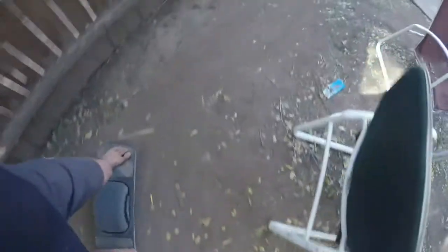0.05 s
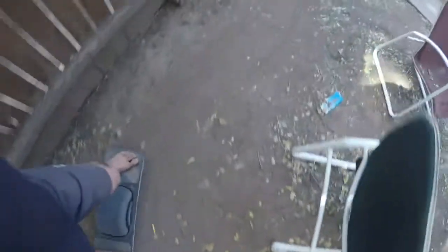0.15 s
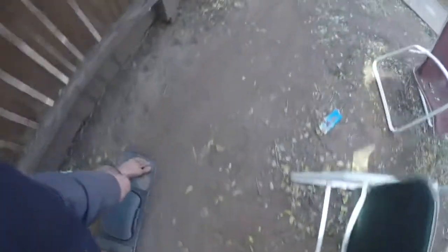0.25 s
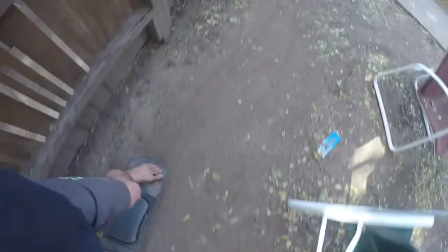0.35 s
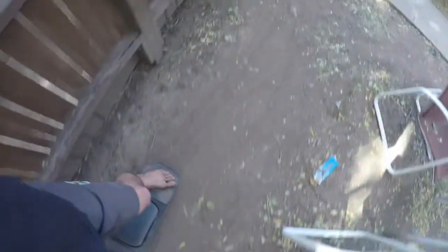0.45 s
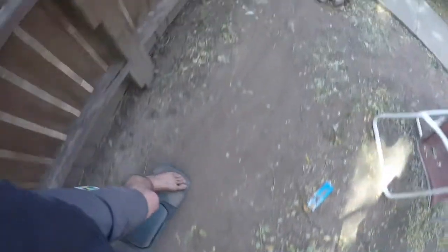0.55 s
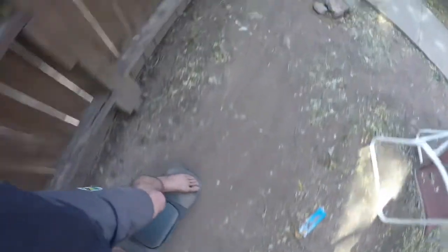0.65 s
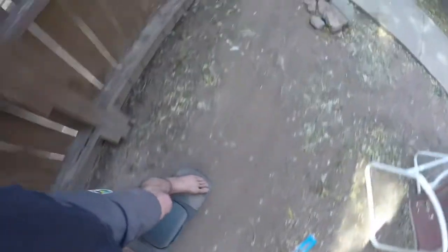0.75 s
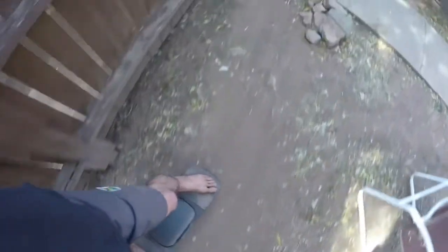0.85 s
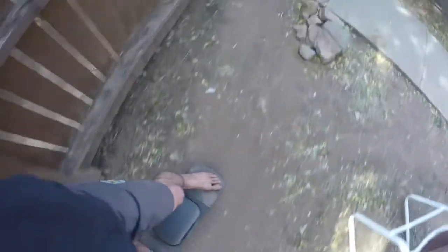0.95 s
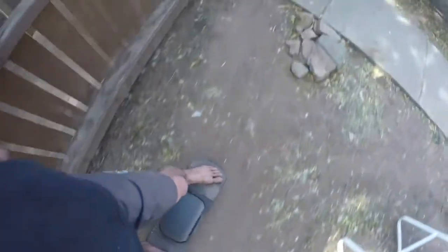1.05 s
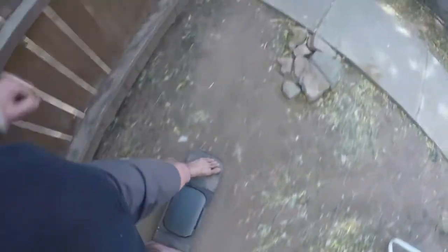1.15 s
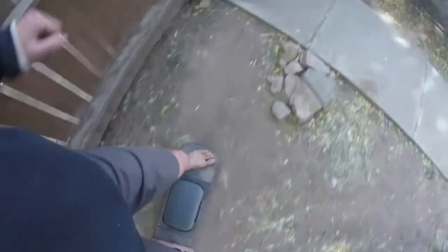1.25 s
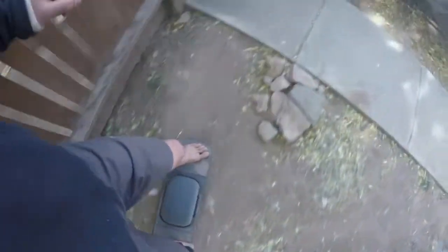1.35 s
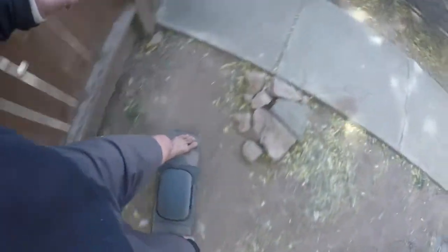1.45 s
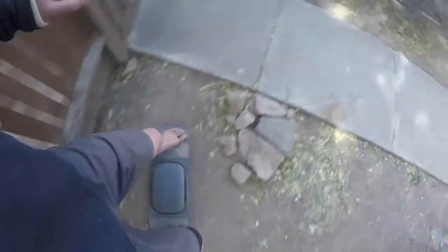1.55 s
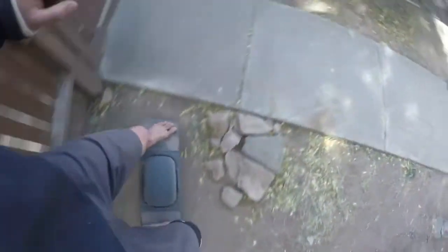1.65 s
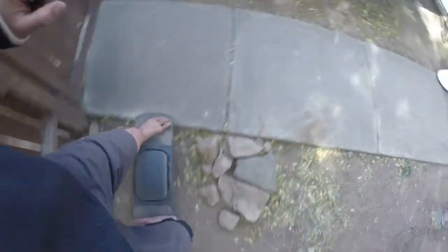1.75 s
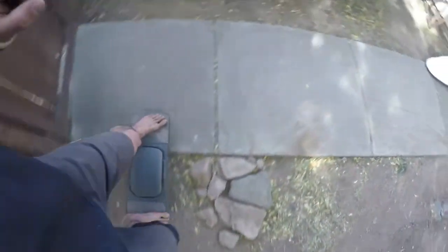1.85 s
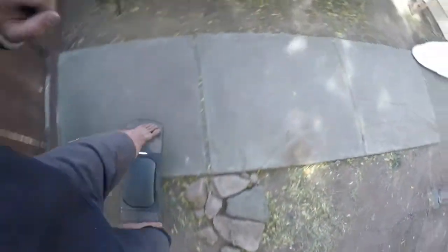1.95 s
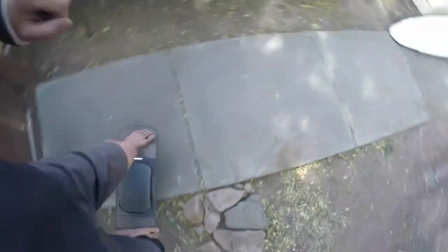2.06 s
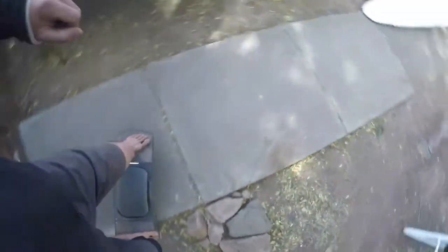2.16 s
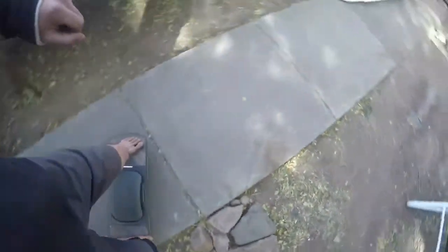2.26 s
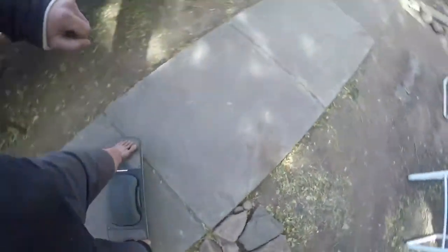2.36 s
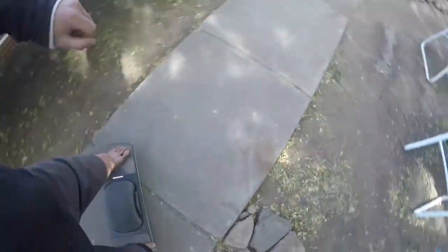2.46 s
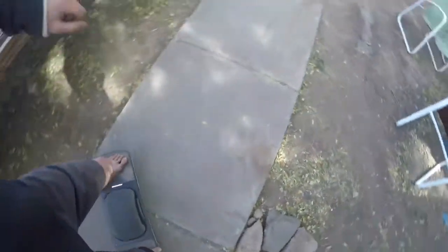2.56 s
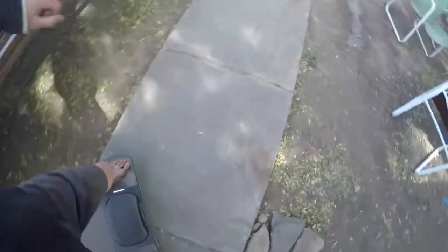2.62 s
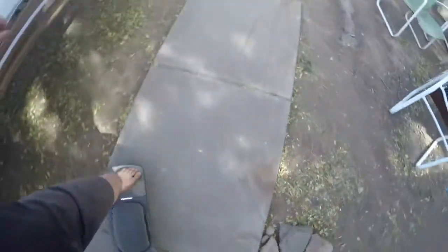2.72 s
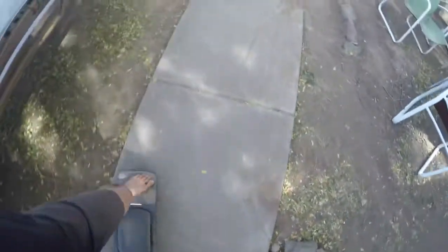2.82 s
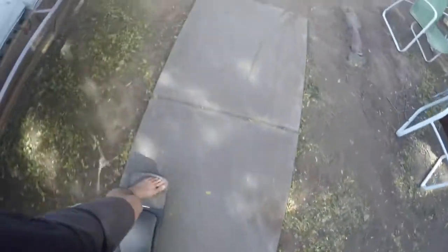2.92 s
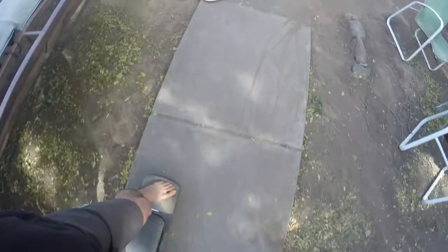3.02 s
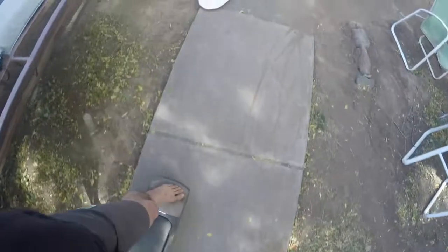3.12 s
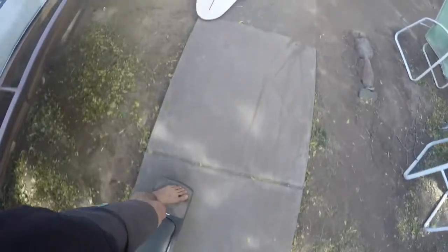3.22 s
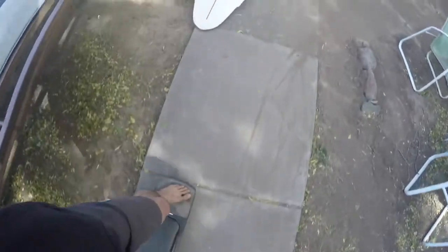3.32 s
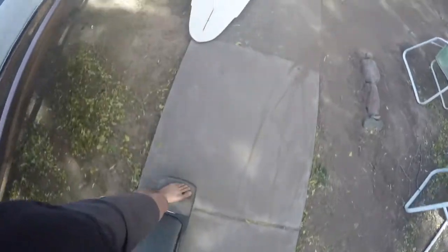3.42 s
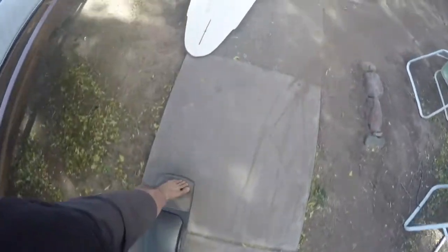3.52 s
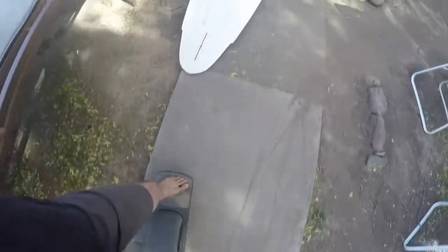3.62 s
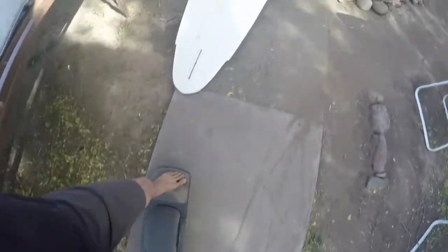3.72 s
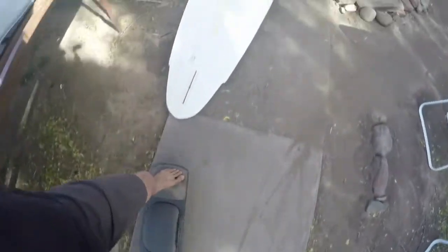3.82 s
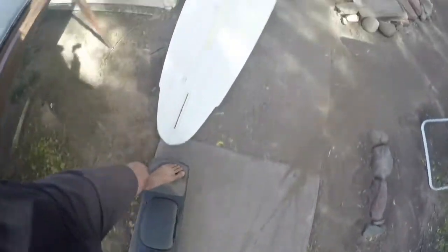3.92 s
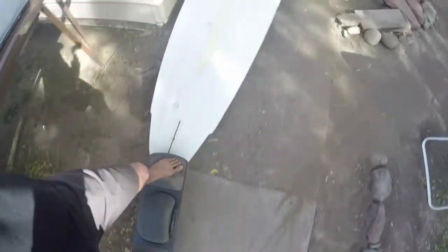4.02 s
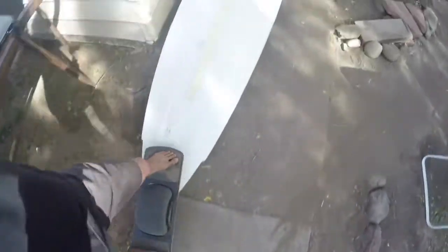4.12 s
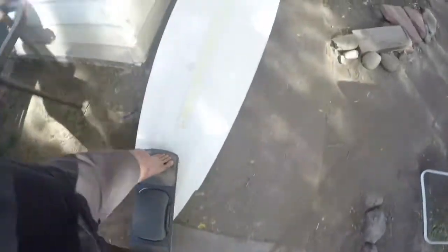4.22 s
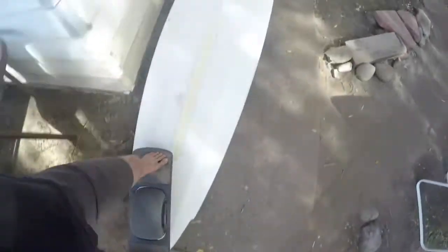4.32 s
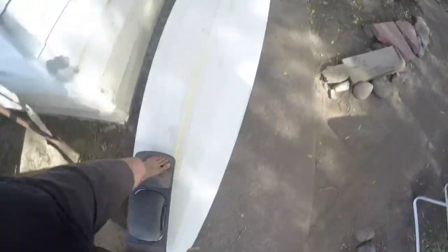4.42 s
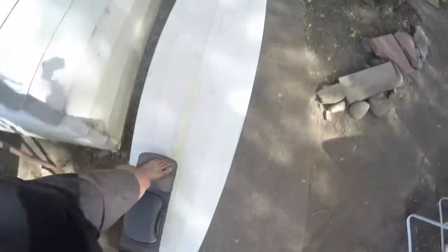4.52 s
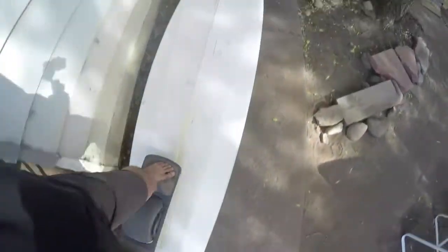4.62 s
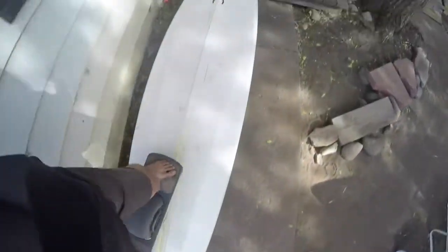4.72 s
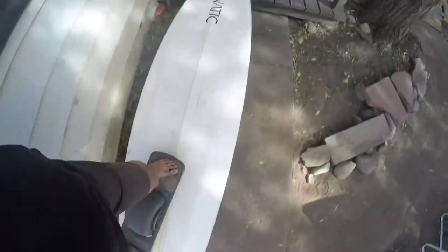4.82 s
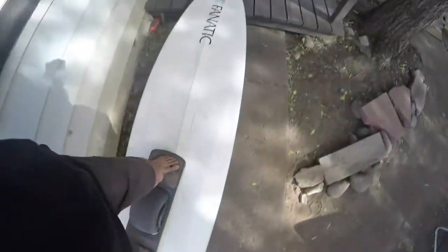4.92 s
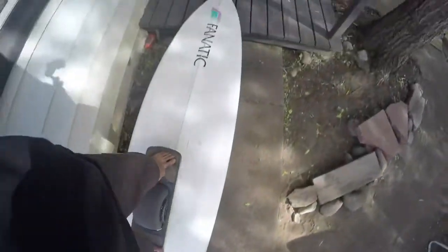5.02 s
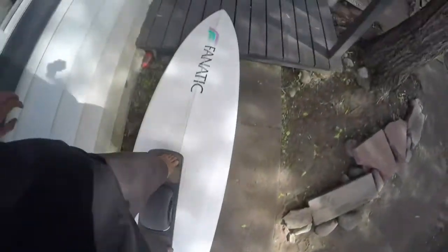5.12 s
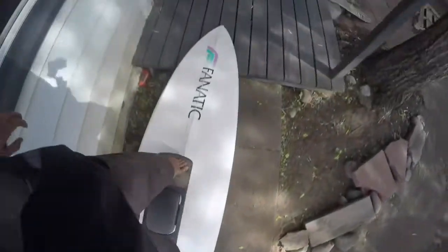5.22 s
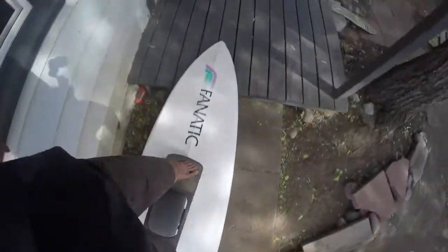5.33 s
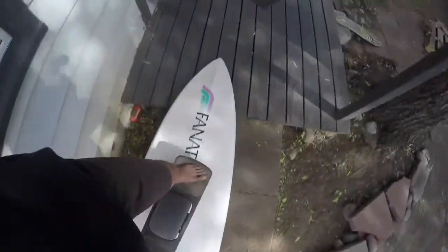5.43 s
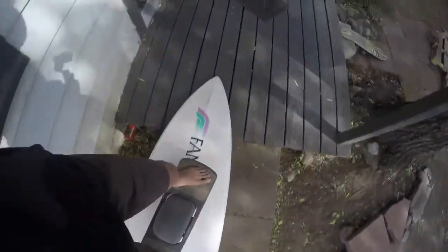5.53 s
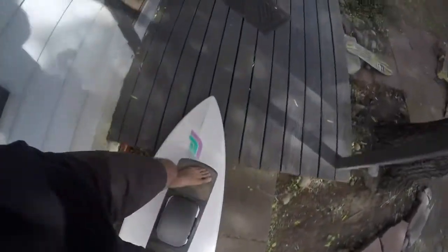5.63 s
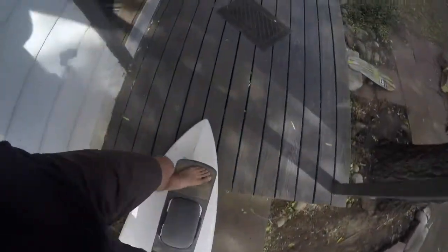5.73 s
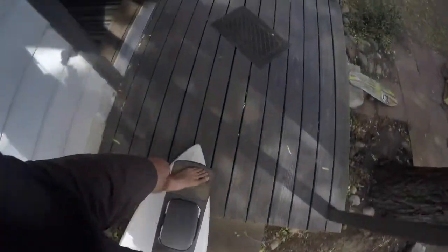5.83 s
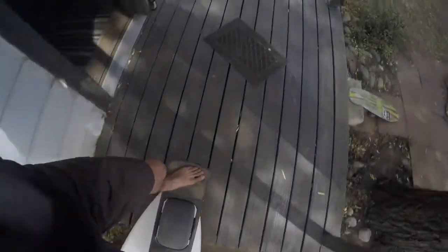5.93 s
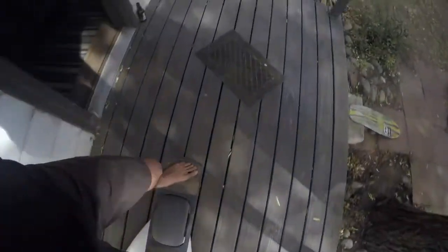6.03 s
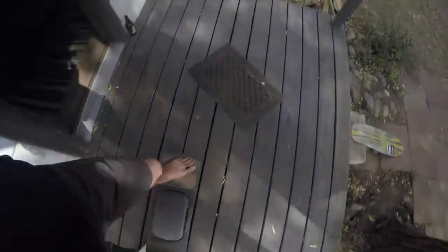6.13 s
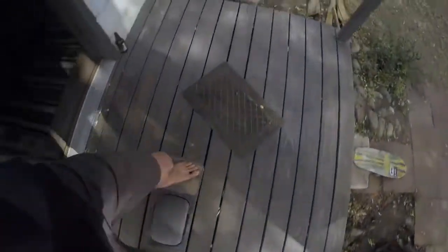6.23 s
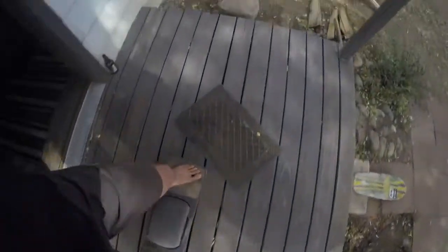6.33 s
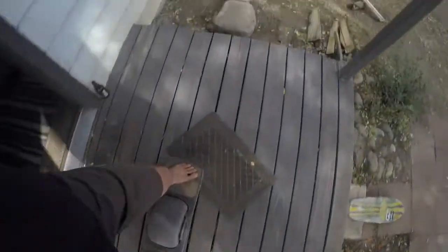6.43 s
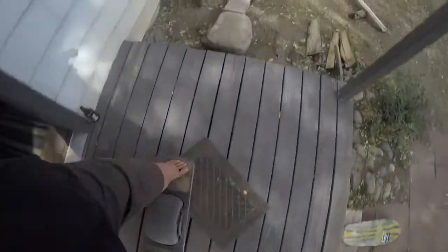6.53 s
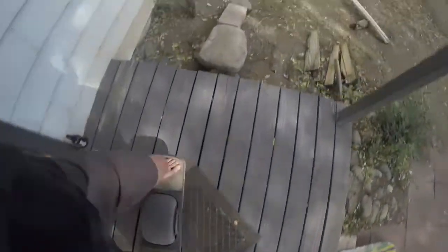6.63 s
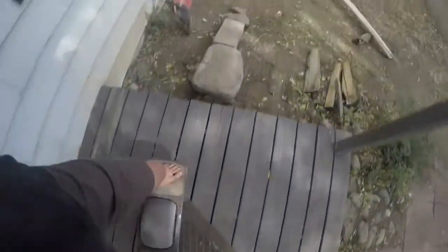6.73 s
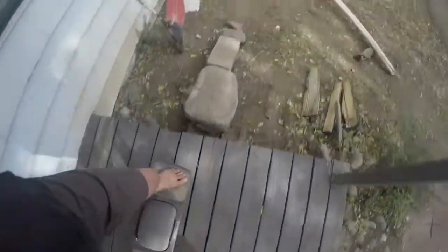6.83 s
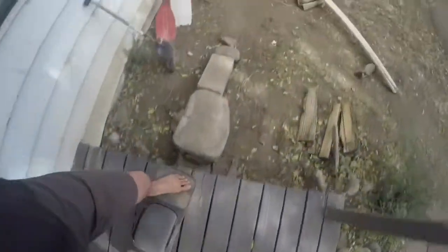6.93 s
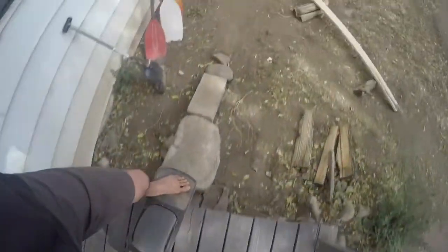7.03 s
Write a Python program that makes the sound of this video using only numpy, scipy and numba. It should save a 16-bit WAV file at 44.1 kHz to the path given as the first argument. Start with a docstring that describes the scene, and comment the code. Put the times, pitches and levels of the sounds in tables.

```python
"""An electric one-wheeled board rolls over dirt: motor hum, tyre noise and small ticks, with a
low drone nearby and wind on the microphone. Near 1.8 s it clacks onto paving and rumbles over the
slabs. At 4.1 s it climbs a hollow surfboard lying on the ground; knocks crack and ring the shell and
grit scrapes under bumper and tyre. Near 6.2 s it drops on a wooden deck, whose planks ring until the
wheel's weight stills them."""
import sys
import numpy as np
from scipy import signal
from scipy.io import wavfile
from scipy.ndimage import uniform_filter1d
from numba import njit

SR = 44100
rng = np.random.default_rng(int(sys.argv[2]) if len(sys.argv) > 2 else 0)


def transcribe(u):
    """Save the signal u as a 16-bit wav file named by the first command-line argument.

    u: samples, shape (n,) or (channels, n), limited to [-1, 1]; the rate is SR.
    q: integer samples, one column per channel.
    """
    v = np.clip(np.atleast_2d(u).T, -1, 1)
    q = np.round(v * 32767).astype(np.int16)
    wavfile.write(sys.argv[1], SR, q)


N = 311785
TIME_S = np.arange(N) / SR


def undb(db):
    return 10 ** (np.asarray(db) / 20)


def unit(x):
    return x / np.sqrt(np.mean(x ** 2))


def power_sum(gains):
    return np.sqrt(sum(g ** 2 for g in gains))


def add(out, start_s, x):
    i = int(start_s * SR)
    out[i:i + len(x)] += x[:N - i]


def curve(table, column=1):
    rows = np.array(table, float)
    return np.interp(TIME_S, rows[:, 0], rows[:, column])


def swell(start_s, db, rise_s, hold_s, fall_s):
    """Gain held from start_s; rise and fall times span 20 dB and are at least 1 ms."""
    t = TIME_S - start_s
    rise_db = 20 * np.minimum(t, 0) / max(rise_s, 1e-3)
    fall_db = 20 * np.maximum(t - hold_s, 0) / max(fall_s, 1e-3)
    return undb(db + rise_db - fall_db)


@njit
def svf(x, hz, damping):
    """State-variable filter: (band-pass, low-pass)."""
    band, low = np.empty(len(x)), np.empty(len(x))
    band_state, low_state = 0., 0.
    g = np.tan(np.pi * hz / SR)
    for i in range(len(x)):
        v = (band_state + g * (x[i] - low_state)) / (1 + g * (g + damping))
        band[i], low[i] = damping * v, low_state + g * v
        band_state, low_state = 2 * v - band_state, low_state + 2 * g * v
    return band, low


def lowpass(x, hz, damping):
    return svf(x, float(hz), damping)[1]


def bandpass(x, hz, width_hz):
    """Two stages, unit RMS out."""
    for _ in range(2):
        x = svf(x, float(hz), width_hz / hz)[0]
    return unit(x)


def ring(x, hz, t60_s):
    """One decaying mode driven by x."""
    pole = np.exp(2j * np.pi * hz / SR - np.log(1000) / (t60_s * SR))
    return signal.lfilter([1], [1, -pole], x).imag


def walk(rate_hz):
    """Smoothed random steps, unit RMS."""
    hold = int(SR / rate_hz)
    steps = np.repeat(rng.standard_normal(N // hold + 1), hold)
    return unit(uniform_filter1d(uniform_filter1d(steps, hold), hold)[:N])


def grit(per_s, spread_db):
    """Random clicks, a few much bigger than the rest."""
    clicks = (rng.random(N) < per_s / SR) * rng.standard_normal(N)
    return clicks * undb(spread_db * np.minimum(rng.exponential(size=N), 5))


# t/s, level/dB, f/Hz, half length/s
TREBLE_PUFFS = [(1.438, -65, 6600, 0.038), (1.878, -70, 7000, 0.014), (1.988, -74, 9900, 0.026),
                (2.329, -78, 8850, 0.051)]

def rustles(hiss_db=-76.5):
    """Smooth puffs of treble over the microphone's own hiss."""
    noise = rng.standard_normal(N)
    out = undb(hiss_db) * noise
    for s, db, hz, half_s in TREBLE_PUFFS:
        out += undb(db) * np.exp(-((TIME_S - s) / half_s) ** 2) * bandpass(noise, hz, 1.15 * hz)
    return out


# t/s, level/dB
DRONE_LEVEL = [(0, -37.5), (.6, -37), (1.6, -51), (2.2, -43), (3.4, -46), (4.5, -52), (5.6, -42),
               (7.07, -75)]

def drone(hz=58.7):
    """One low wavering tone nearby."""
    phase = 2 * np.pi * np.cumsum(hz * (1 + 0.009 * walk(6.2))) / SR
    return np.sqrt(2) * undb(curve(DRONE_LEVEL) + 0.6 * walk(37)) * np.sin(phase)


# Turbulence: t/s, level/dB
WIND_LEVEL = [(0, -39), (.18, -31.5), (.49, -30), (.55, -49.5), (1.75, -36.5), (1.89, -27), (2.03, -44.5),
              (2.77, -27), (2.91, -52), (3.05, -28.5), (3.25, -38), (3.68, -32), (4.05, -31.5),
              (4.8, -31.5), (5.22, -25.5), (5.42, -37), (6.06, -36.5), (6.16, -20.5), (6.24, -30.5),
              (6.79, -26), (7.07, -36.5)]
# t/s, level/dB, hold/s
WIND_GUSTS = [(0.144, -36.5, 0.012), (0.293, -27.5, 0.0038), (0.336, -41.5, 0.27), (2.4, -48, 0.29),
              (2.742, -39.5, 0.24), (3.08, -43.5, 0.028), (3.712, -30.5, 0.056), (3.79, -27, 0.0076),
              (4.005, -34, 0.17), (4.564, -33.5, 0.11), (4.782, -36, 0.21), (5.105, -25, 0.0051),
              (5.192, -25, 0.04), (5.25, -35.5, 0.069), (6.536, -29.5, 0.007), (6.709, -32, 0.098),
              (6.948, -45.5, 0.11)]
# t/s, level/dB, f/Hz (1 / cycle length)
WIND_BUFFETS = [(0.259, -26.5, 51.4), (2.758, -47, 86), (3.738, -24, 51), (3.786, -12, 88),
                (4.012, -19.5, 104), (4.06, -16, 56.5), (4.11, -11.5, 66.6), (4.144, -12, 97),
                (4.292, -12.5, 55.8), (4.659, -27, 50.6), (4.769, -38, 81), (4.855, -14.5, 53),
                (5.107, -38, 51.2), (5.181, -21, 85.5), (5.207, -12.5, 65.5), (6.12, -22, 129),
                (6.144, -20, 120), (6.53, -18.5, 74.6), (6.542, -19, 52), (6.694, -14, 126),
                (6.714, -10.5, 106), (6.766, -15, 60.7), (6.788, -11, 87.5)]

def wind(gust_rise_s=0.065, gust_fall_s=0.031, gust_rumble_db=0.5):
    """Air on the microphone: low turbulence, fluttering gusts and one-cycle buffets, all low-passed."""
    low_eddies, high_eddies = rng.standard_normal((2, N)) * undb(0.5 * walk(31))
    gusts = power_sum(swell(s, db, gust_rise_s, hold_s, gust_fall_s) for s, db, hold_s in WIND_GUSTS)
    turbulence = unit(lowpass(bandpass(low_eddies, 36, 98), 75, damping=1.0))
    flutter = bandpass(high_eddies, 122, 177) + 0.23 * bandpass(high_eddies, 230, 510)
    out = power_sum([undb(curve(WIND_LEVEL)), undb(gust_rumble_db) * gusts]) * turbulence
    out += gusts * unit(lowpass(flutter, 450, damping=2.2))
    for s, db, hz in WIND_BUFFETS:
        cycles = np.arange(int(2.2 * SR / hz)) * hz / SR
        pressure = -np.sin(2 * np.pi * cycles ** 0.51)  # jumps fast, relaxes slowly
        add(out, s, undb(db) * pressure * np.exp(-((cycles - 0.4) / 0.56) ** 2))
    return lowpass(out, 700, damping=1.98)


# t/s, pulse rate/Hz, level/dB, extra on order 3/dB
MOTOR_RUN = [(0, 26.6, -31.5, 2), (.35, 26.96, -31.5, -9), (1.2, 27.44, -30.5, -1.5), (1.9, 28.69, -37, 5),
             (3.2, 28.97, -36, 2.5), (4.0, 29.72, -35, -1), (4.6, 30.33, -43, -1.5), (7.07, 29.77, -50, -2)]
# Multiple of the pulse rate, gain/dB
MOTOR_ORDERS = [(1, -15.5), (2, -24.5), (3, -6.5), (4, -3), (5, -16.5), (6, -19.5), (7, -21), (8, -28.5)]
# f/Hz, level before load gain/dB
SWITCHING_TONES = [(14290, -98), (14530, -94)]
# t/s, hold/s, whine gain/dB
MOTOR_PULLS = [(.35, 1.2, 4), (3.45, 0.92, 5), (4.598, 0.54, 2), (6.55, 0.35, 3)]

def motor(coast_db=-10, fade_s=0.15):
    """Wavering harmonics of the pulse rate; a thin switching whine grows when the motor pulls."""
    phase = 2 * np.pi * np.cumsum(curve(MOTOR_RUN) * (1 + 0.0043 * walk(9.82))) / SR
    third_db = curve(MOTOR_RUN, column=3)
    hum = whine = 0
    for order, db in MOTOR_ORDERS:
        gain = undb(db + 2.5 * walk(26) + third_db * (order == 3))
        hum += gain * np.sin(order * phase + 0.52 * walk(22) + 2 * np.pi * rng.random())
    for hz, db in SWITCHING_TONES:
        whine += undb(db + 3 * walk(15)) * np.sin(2 * np.pi * hz * TIME_S + 6 * walk(30))
    load = undb(coast_db) + sum(swell(s, db, fade_s, hold_s, fade_s) for s, hold_s, db in MOTOR_PULLS)
    return np.sqrt(2) * (undb(curve(MOTOR_RUN, column=2)) * hum + load * whine)


# t/s, level/dB, rise/s, hold/s, fall/s
SLAB_SWELL = (2, -41, -0.1, 1.64, 0)

def slab_rumble():
    """A narrow, uneven low band while the tyre is on the slabs."""
    return swell(*SLAB_SWELL) * bandpass(rng.standard_normal(N), 100, 14)


# Rows: dirt, paving, surfboard tail, its belly and nose, deck
# t/s, rolling level/dB, crunch tilt/(dB/oct), hollow level/dB
SURFACES = [(0, -45.5, 0.18, -80), (1.85, -46.5, -0.28, -64.5), (4.15, -46, 0.2, -56),
            (4.9, -45.5, -0.2, -53), (6.151, -47, 0.06, -52.5)]
# Tyre and surroundings: f/Hz, relative density/dB
ROLL_SPECTRUM = [(88, -8.5), (150, -3), (196, -1.5), (278, -3.5), (343, -7.5), (450, -10.5), (545, -9.5),
                 (954, -24.5), (1200, -20), (1490, -25), (3670, -35), (6680, -45.5), (15000, -74)]

def tyre(crossing_s=0.23):
    """Gritty rolling noise in flickering third-octave bands, plus a broad resonance on hollow ground."""
    surfaces, spectrum = np.array(SURFACES, float), np.array(ROLL_SPECTRUM)
    under_tyre = surfaces[np.searchsorted(surfaces[1:, 0], TIME_S), 1:]
    level_db, tilt_db_oct, hollow_db = uniform_filter1d(under_tyre.T, int(crossing_s * SR))
    shared_db = 0.6 * walk(8.8)
    fine_grit = 0.31 * unit(grit(3000, spread_db=6))
    rolling = 0
    for hz in 94 * 2 ** (np.arange(22) / 3):
        band_db = np.interp(np.log(hz), np.log(spectrum[:, 0]), spectrum[:, 1]) + 10 * np.log10(hz)
        gain = undb(band_db + tilt_db_oct * np.log2(hz / 1000) + shared_db + 1.1 * walk(14))
        rolling += gain * bandpass(rng.standard_normal(N) + fine_grit, hz, hz / 3)
    hollow = undb(hollow_db + 1.8 * walk(15)) * bandpass(rng.standard_normal(N), 600, 780)
    return undb(level_db) * unit(rolling) + hollow


# t/s, level/dB, f/Hz, bandwidth/f, t60/s
TICKS_AND_CRACKS = [(0.295, -55, 1300, 1, 0.023), (.868, -55, 3000, 0.89, .015),
                    (.947, -47, 1500, 0.67, .03), (1.032, -51, 1500, 0.74, .025),
                    (1.492, -50, 1500, .9, 0.027), (1.607, -47.5, 1600, 0.83, .03),
                    (1.667, -48, 4500, 2.6, 0.0082), (1.73, -52, 1540, .8, .025),
                    (1.761, -48, 1320, .8, .025), (1.951, -51, 1900, .6, .02),
                    (1.977, -43, 1960, 0.39, 0.048), (2.041, -56, 3650, 0.56, 0.03),
                    (2.187, -57, 1100, .7, 0.023), (2.354, -51.5, 3900, 0.9, 0.025),
                    (2.411, -55.5, 3030, 0.45, 0.023), (2.593, -52, 1400, 1.2, 0.018),
                    (2.595, -57, 5020, 1.45, 0.007), (2.62, -45, 700, .7, .03), (2.78, -53, 700, .7, .03),
                    (2.909, -44, 750, 0.59, 0.045), (2.945, -46, 1200, 0.48, 0.095),
                    (2.946, -53, 2600, 0.35, 0.027), (2.983, -56, 2600, 0.26, .03),
                    (3.068, -51.5, 1180, 0.55, .025), (3.601, -49, 700, .7, .03),
                    (4.066, -43.5, 3730, 0.8, 0.025), (4.110, -40, 12000, 2.2, 0.011),
                    (4.126, -43, 12000, 1.5, .015), (4.155, -18, 1920, 0.65, 0.023),
                    (4.165, -23, 2000, 0.35, 0.027), (4.311, -18.5, 1100, 0.85, 0.02),
                    (4.317, -17.5, 750, 0.54, 0.045), (4.363, -32, 3020, 0.34, 0.029),
                    (4.365, -44, 4970, 0.47, 0.037), (4.364, -56, 9000, 1.5, .025),
                    (4.39, -48, 7900, 0.71, 0.021), (4.844, -46.5, 2500, 0.78, 0.03),
                    (4.886, -53, 2170, 1.4, 0.075), (5.522, -41.5, 1700, 1, 0.092),
                    (5.541, -53, 3000, 1.2, .04), (5.571, -41, 1510, 0.92, 0.11),
                    (5.716, -56, 4000, 0.96, 0.026), (5.803, -42, 1300, .9, 0.085),
                    (5.802, -43.5, 2900, 0.091, 0.059), (5.804, -45, 3800, 0.11, 0.046),
                    (6.017, -49, 3376, 1.6, 0.015), (6.128, -45.5, 3630, 0.37, 0.041),
                    (6.19, -55.5, 2515, 1, 0.027), (6.572, -52, 4340, 0.47, 0.012),
                    (6.845, -45, 2340, 0.28, 0.079), (6.974, -47.5, 1680, 0.5, 0.057)]

def ticks_and_cracks():
    """Small ticks under the tyre, and sharp cracks as the board strikes the surfboard."""
    out, t = np.zeros(N), np.arange(SR // 8) / SR
    for s, db, hz, width, t60_s in TICKS_AND_CRACKS:
        noise = rng.standard_normal(len(t))
        tone = bandpass(noise, hz, width * hz) * 1000. ** (-t / t60_s)
        snap = bandpass(noise, min(4.9 * hz, 12000), 13 * hz) * np.exp(-t / 0.00057)
        add(out, s, undb(db) * (tone + 0.033 * snap))
    return out


# t/s, level/dB, rise/s, hold/s, fall/s, rasp f/Hz, relative treble/dB
GRIT_SCRAPES = [(2.925, -66, .06, 0.064, 0.036, 1270, -45), (2.93, -50.5, .05, 0.045, 0.05, 595, -42),
                (4.09, -43.5, .004, 0.028, 0.028, 1670, -16), (4.159, -37, 0.082, 0, 0.096, 2180, -23),
                (4.313, -52, 0.0078, 0.012, 0.45, 1830, -28), (4.558, -53, 0.004, 0, 0.26, 2100, -22),
                (4.605, -63, 0.027, 0.049, 0.071, 3730, -6),
                (4.81, -52, 0.026, 0.00017, 0.062, 1600, -17.5),
                (4.884, -49.5, 0.021, 0.0068, 0.073, 1760, -26),
                (4.97, -59.5, 0.037, 0.031, 0.034, 1950, -28), (5.521, -60, .004, 0.1, 0.041, 1870, -21),
                (5.802, -49, 0.0032, 0.0086, 0.021, 1630, -27),
                (6.099, -50, 0.0025, 0.0066, 0.078, 1500, -30),
                (6.193, -37.5, 0.0024, 0.011, 0.035, 1480, -29),
                (6.275, -57.5, 0.049, 0.099, 0.047, 2000, -28)]

def scrapes():
    """Grit dragged under bumper and tyre, heard through the shell and as bright hiss."""
    grains = unit(grit(9000, spread_db=2)) * undb(1.6 * walk(90))
    bright = bandpass(grains, 8200, 12000)
    return sum(swell(*envelope) * (bandpass(grains, hz, 1.27 * hz) + undb(treble_db) * bright)
               for *envelope, hz, treble_db in GRIT_SCRAPES)


# t/s, level/dB, f/Hz, snap f/Hz, relative snap/dB, decay/s
PAVING_JOINTS = [(1.77, -33.5, 414, 1400, -22, 0.0055), (1.855, -27.5, 558, 2100, -15, 0.0058),
                 (3.511, -28.5, 627, 1320, -30, 0.0051)]

def clacks():
    """The tyre hits paving joints: a sharp snap, a dull ring of the frame, a short gritty tail."""
    out, t = np.zeros(N), np.arange(SR // 8) / SR
    onset, thud_onset = 1 - np.exp(-(t / 0.0006) ** 2), 1 - np.exp(-(t / 0.001) ** 2)
    for s, db, hz, snap_hz, snap_db, decay_s in PAVING_JOINTS:
        noise = rng.standard_normal(len(t))
        thud = 1.3 * np.sin(2 * np.pi * hz * t) + 0.5 * bandpass(noise, hz, 0.6 * hz)
        thud *= thud_onset * np.exp(-t / decay_s)
        frame = 0.45 * bandpass(noise, 1.6 * hz, 700) * np.exp(-t / 0.005)
        snap = 1.5 * np.sin(2 * np.pi * snap_hz * t) + 0.6 * bandpass(noise, snap_hz, 1200)
        snap *= np.exp(-t / 0.0015)
        tail = 0.28 * bandpass(noise, snap_hz, snap_hz) * np.exp(-t / 0.011)
        add(out, s, undb(db) * (thud + onset * (frame + undb(snap_db) * (snap + tail))))
    return out


def judder(modes, knocks, gain_db, linger_db, fall_s):
    """A body keeps shaking in its modes after each blow."""
    shaking = uniform_filter1d(grit(1500, spread_db=2), size=12)
    envelope = power_sum(swell(s + 0.0047, db + gain_db, 0.005, 0, fall_s)
                         + swell(s + 0.0029, db + linger_db, 0.0036, 0, 3 * fall_s)
                         for s, db, *_ in knocks)
    return envelope * unit(sum(undb(db) * ring(shaking, hz, t60_s) for hz, db, t60_s in modes))


def blow(modes, level_db, crack_db, t60_scale, tilt_db_oct, crack_s, tail_s, tail_db, crack_hz=1270):
    """One knock and its crack; each strikes another spot, so the modes vary in level and pitch."""
    t = np.arange(SR // 2) / SR
    note = 0
    for hz, db, t60_s in modes:
        spot_db, detune = rng.standard_normal(2) * (4.3, 0.025)
        gain = undb(db + spot_db + tilt_db_oct * np.log2(hz / 300))
        note += gain * np.sin(2 * np.pi * hz * (1 + detune) * t) * 1000. ** (-t / (t60_scale * t60_s))
    note *= 1 - np.exp(-(t / 0.0015) ** 2)  # rubber and plastic push for a few ms
    noise = rng.standard_normal(len(t))
    crack = unit(bandpass(noise, crack_hz, 0.75 * crack_hz) + 0.018 * bandpass(noise, 5450, 6700))
    crack *= np.exp(-t / crack_s) + undb(tail_db) * np.exp(-t / tail_s)
    return undb(level_db) * (note / np.max(np.abs(note)) + undb(crack_db) * crack)


# f/Hz, relative level/dB, t60/s
SHELL_MODES = [(139, -15.5, 0.1), (189.3, -1, 0.2), (234.4, 9.5, 0.058), (279.4, 8, 0.1), (340, 5, 0.08),
               (433, -6.5, 0.069), (576, -10, 0.095), (670, -10.5, 0.069), (755, -12, 0.062),
               (915, -19.5, 0.039), (1125, -17.5, 0.064), (1600, -19, 0.015), (2100, -30, 0.018)]
# t/s, level/dB, relative crack/dB, t60 scale, tilt/(dB/oct)
SHELL_KNOCKS = [(4.084, -17.5, -19, 1, 7.5), (4.105, -14.5, -23, 1, 8), (4.127, -15.5, -19, 1, 8.5),
                (4.154, -13.5, -6.5, 0.93, 7), (4.166, -12.5, -6, 0.46, 7), (4.172, -5.5, -30, 0.66, 5.5),
                (4.181, -12, -18, 0.76, 6), (4.188, -6, -23, 0.98, 3), (4.314, 1.5, -20.5, 0.42, -15),
                (4.334, -10, -20, 0.19, -12), (4.352, -14.5, -18, 0.37, -18), (4.364, -17, -27, 0.24, -14),
                (4.3893, -2.5, -19, 0.17, 4), (4.404, -20, -32, 0.94, 6), (4.453, -27, -40, 0.84, -1),
                (4.559, -24.5, -26, 0.16, -6)]

def surfboard():
    """The hollow shell rings and judders as the board climbs it."""
    out = judder(SHELL_MODES, SHELL_KNOCKS, gain_db=-25.5, linger_db=-22.5, fall_s=0.075)
    for s, *knock in SHELL_KNOCKS:
        add(out, s, blow(SHELL_MODES, *knock, crack_s=0.0045, tail_s=0.048, tail_db=-15))
    return out


# f/Hz, relative level/dB, t60/s
PLANK_MODES = [(136, -23, 0.13), (176.2, -1, 0.58), (210.5, -6.5, 0.17), (259.3, -8, 0.25),
               (336.3, -2, 0.17), (361.3, -3, 0.12), (421, -4, .07), (507, -3, 0.074), (605, -3.5, 0.063),
               (763, -9, .06), (902, -23.5, 0.11), (1100, -26.5, 0.09), (1257, -27, 0.041)]
# t/s, level/dB, relative crack/dB, t60 scale, tilt/(dB/oct)
PLANK_KNOCKS = [(6.097, -32.5, -1.5, 0.17, 5), (6.125, -20, -20.5, 0.34, -2),
                (6.189, -2.5, -27, 0.64, -5.5), (6.198, -11, -25, 0.36, -1.5), (6.218, -18, -20, 0.46, 2),
                (6.276, -19, -34.5, 0.6, 0.5), (6.295, -8, -25, 0.43, 0.5), (6.352, -16, -27.5, 0.59, 3.5),
                (6.372, -12.5, -24.5, 0.87, 2), (6.384, -17, -28.5, 0.51, 9), (6.403, -17, -33, 1, -4.5),
                (6.43, -19.5, -39, 1, -6)]

def deck(landing_s=6.19, low_hz=400, rise_per_s=0.24, still_s=6.475, fade_s=0.049):
    """Struck planks: low modes rise from knock to knock as the wheel rolls on; its weight stills them."""
    out = judder(PLANK_MODES, PLANK_KNOCKS, gain_db=-7.5, linger_db=-40.5, fall_s=0.084)
    for s, *knock in PLANK_KNOCKS:
        lift = 1 + rise_per_s * max(s - landing_s, 0)
        modes = [(hz * lift if hz < low_hz else hz, db, t60_s) for hz, db, t60_s in PLANK_MODES]
        add(out, s, blow(modes, *knock, crack_s=0.0036, tail_s=0.085, tail_db=-7))
    return out * undb(-20 * np.maximum(TIME_S - still_s, 0) / fade_s)


def scene():
    """Mono sum of all sources."""
    knocks = surfboard() + deck()
    bed = motor() + drone() + wind() + tyre()
    return (knocks + bed + scrapes() + rustles() + clacks() + ticks_and_cracks() + slab_rumble())[None]


def record(dry):
    """Soft peak limit, then a steep top cut."""
    ceiling, knee, top_hz = 0.5, 4, 15150
    soft = dry / (1 + np.abs(dry / ceiling) ** knee) ** (1 / knee)
    return signal.sosfilt(signal.ellip(8, 0.2, 70, top_hz, fs=SR, output="sos"), soft)


dry = scene()
out = record(dry)
transcribe(out)
```